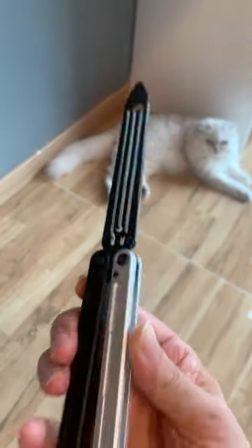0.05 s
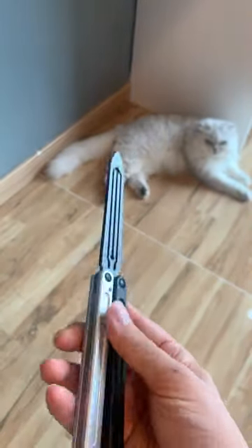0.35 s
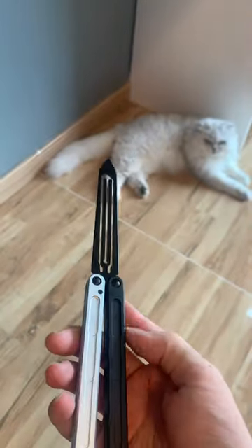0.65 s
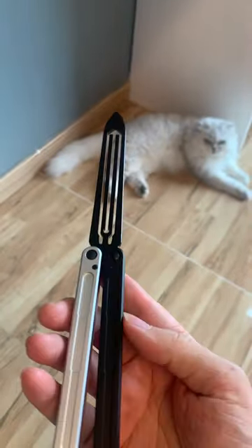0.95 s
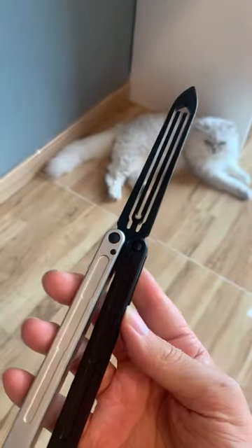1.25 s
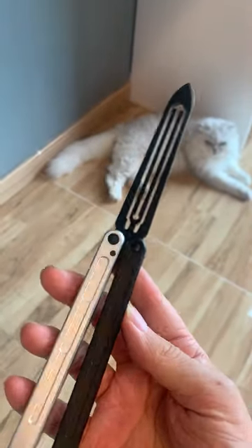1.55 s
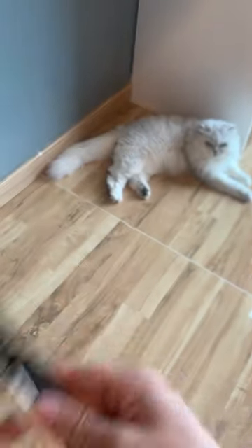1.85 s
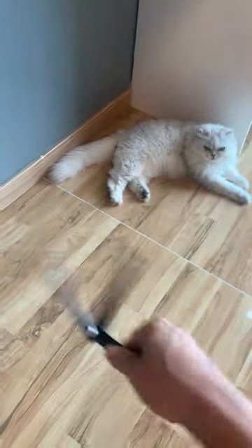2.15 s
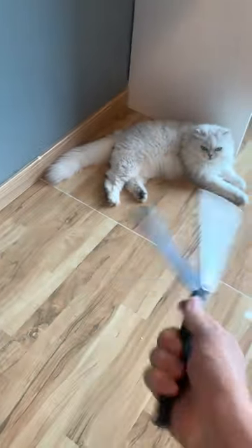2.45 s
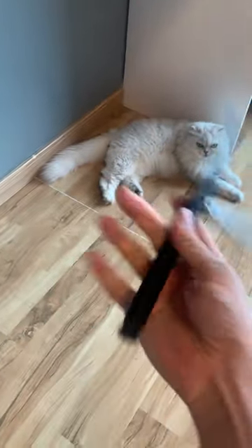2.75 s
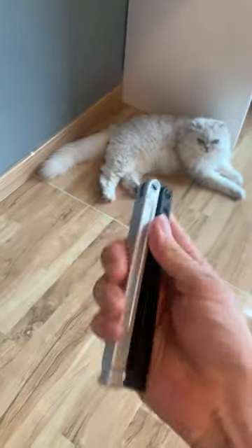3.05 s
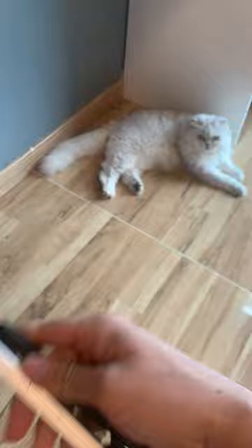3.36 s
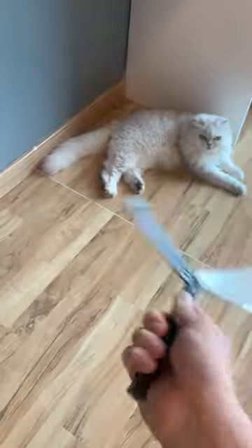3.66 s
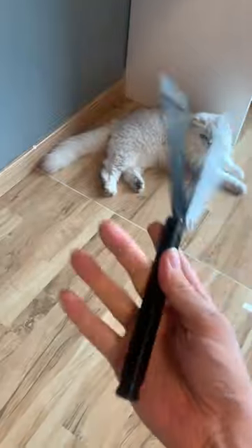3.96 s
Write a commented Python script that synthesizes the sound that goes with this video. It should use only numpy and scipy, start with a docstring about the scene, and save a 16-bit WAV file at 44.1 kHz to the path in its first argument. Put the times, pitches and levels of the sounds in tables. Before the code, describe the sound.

Close by in a quiet room with a low hum, a butterfly knife ticks faintly as it is turned. Dull metal knocks lead to a bright, briefly ringing double clack as the handles shut, then a last knock.

```python
"""Flipping a butterfly knife

A metal butterfly knife is flipped by hand, close by, in a small, quiet room. Its loose pivots tick
faintly and its swinging handles knock dully, damped by the hand. Then the handles slam shut with a
double clack and ring until the fingers close on them. The room echoes briefly over a low hum."""
import sys
import numpy as np
from scipy import signal
from scipy.fft import rfft, irfft
from scipy.io import wavfile
from scipy.ndimage import uniform_filter1d

SR = 44100
rng = np.random.default_rng(int(sys.argv[2]) if len(sys.argv) > 2 else 0)


def generate_wav(signal):
    """Clip the signal to [-1, 1] and save it as 16-bit WAV at the path in sys.argv[1]."""
    frames = np.transpose(np.atleast_2d(signal))
    scaled = np.clip(frames, -1, 1) * 32767
    pcm = np.round(scaled).astype(np.int16)
    wavfile.write(sys.argv[1], SR, pcm)


N = 176400
T = np.arange(SR) / SR  # one second of time, for a single hit or echo


def handle_clacks():
    """A faint tick leads into the sharp clacks of the handles slamming together."""
    # the faint tick, then the clacks: (time [s], level [dB], brightness [dB/octave],
    #  main resonance [Hz], its boost [dB], left over right [dB], left delay [ms])
    hits = [(2.9042, -38.5, -4, 3800, 6, -5, .4), (2.9087, -17.5, -1, 5450, 11.5, -2.5, .45),
            (2.9125, -15.5, 0.5, 5500, 16.5, -2, .45), (2.9208, -20.5, 2, 8200, 9, 5, .4),
            (2.9595, -16, 0, 2850, 6, -2.5, .3), (3.0385, -39.5, -4, 3300, 9, 0, .2),
            (3.0453, -38.5, -7, 2800, 19, -4, .2)]
    # tone of a clack: (frequency [Hz], level [dB])
    colour = [(100, -4), (400, -8.5), (1000, -26), (1600, -7), (2200, -16), (2500, 0), (3800, -0.5),
              (4500, -7.5), (5800, -2.5), (8300, -0.5), (10550, -3), (10850, 5.5), (11100, 0.5), (11400, 0),
              (11800, -3), (12150, 3.5), (12750, -7.5), (13090, -2.5), (13400, -4.5)]
    out = np.zeros((2, N))
    for s, db, *tone in hits:
        add(out, s, contact(db, colour, *tone, crack_s=.03, clatter_s=.05, clatter_db=-5))
    return out


def handle_ring(slam_s=2.909):
    """The handles ring on after the slam, until the fingers grip them."""
    # notes of the loose handles: (frequency [Hz], level [dB], time to fade 60 dB [s])
    notes = [(2379, -43, .65), (2562, -33, .3), (3420, -31, .25), (5391, -27, .28), (5475, -27.5, 1.9),
             (5880, -32, .3), (6306, -24, .38), (8048, -31, .2), (8180, -30, .22), (8748, -39, 1.1),
             (10835, -33, .56), (11390, -34, .28), (12150, -29, .26), (13088, -25, .45)]
    # the ring's loudness as the knife turns and the fingers close: (time [s], level [dB])
    grip = [(2.909, 0), (3.17, 0), (3.23, -11), (3.285, -5), (3.32, -18), (3.46, -18), (3.56, -32),
            (3.9, -70)]
    grip_gain = amp(np.interp(slam_s + T, *np.transpose(grip)))
    out = np.zeros((2, N))
    add(out, slam_s, ring(notes, level_db=-0.5) * grip_gain)
    return out


def handle_knocks():
    """A swinging handle is stopped while the hand damps it: a dull knock and a short ring."""
    # (time [s], level [dB], brightness [dB/octave], main resonance [Hz], its boost [dB],
    #  left over right [dB], left delay [ms])
    knocks = [(2.258, -52, -1, 2600, 16, -2, 0), (2.3036, -40, 0.5, 2400, 13, -1, .15),
              (2.5868, -25.5, -1.5, 3520, 11, -4, .15), (2.6033, -32.5, -0.5, 3560, 1, 0, 0),
              (3.743, -24.5, -0.9, 3640, 4, -1.5, -.1)]
    # tone of a knock: (frequency [Hz], level [dB])
    colour = [(150, -18.5), (900, -16), (1400, -17.5), (1950, 0), (2700, -3.5), (4000, 0), (4800, -6),
              (7300, -3), (8400, -3), (8900, -8.5), (11000, -17.5), (13300, -15.5)]
    # notes of the knife held by one handle: (frequency [Hz], level [dB], time to fade 60 dB [s])
    notes = [(2239, -11, .2), (2379, -13, .2), (3980, -11, .22), (6306, -11, .3), (6890, -14, .24),
             (7477, -18, .28), (10800, -22, .22), (11380, -21, .22), (12150, -25, .2), (13088, -23, .25)]
    out = np.zeros((2, N))
    for s, db, *tone in knocks:
        knock = contact(db, colour, *tone, crack_s=.018, clatter_s=.11, clatter_db=-13)
        add(out, s, knock + ring(notes, db - 13.5))
    return out


def pivot_ticks():
    """The slightly loose pivots tick as the knife is turned over."""
    # (time [s], level [dB], main resonance [Hz])
    ticks = [(0.1436, -54.5, 11000), (.192, -66, 10600), (.2848, -65, 7370), (0.514, -64, 13000),
             (1.666, -65, 11100), (1.8926, -68, 7550), (2.12, -65.5, 6800)]
    # tone of a tick: (frequency [Hz], level [dB])
    colour = [(1000, -27), (5000, -19), (7600, -3.5), (8800, -14), (11000, -3.5), (12200, -17),
              (13200, -2.5)]
    out = np.zeros((2, N))
    for s, db, hz in ticks:
        add(out, s, contact(db, colour, tilt_db=0, peak_hz=hz, boost_db=12, pan_db=0, lag_ms=0,
                            crack_s=.031, clatter_s=.23, clatter_db=0, width=.014))
    return out


def contact(level_db, colour, tilt_db, peak_hz, boost_db, pan_db, lag_ms,
            crack_s, clatter_s, clatter_db, width=.092):
    """One metallic click: a crack and a short, dense clatter, shaped by the knife's resonances."""
    crack, left, other = rng.standard_normal((3, SR))
    likeness = 0.58  # how alike the clatter is on the left and right
    clatter = stereo(left, other, likeness) * amp(clatter_db - 60 * T / clatter_s)
    burst = rfft(crack * amp(-60 * T / crack_s) + clatter)
    burst /= np.sqrt(uniform_filter1d(abs(burst) ** 2, size=1200, axis=1))  # even out the tone
    hz = abs(np.fft.fftfreq(SR, 1 / SR)) + 1
    tone_db = read(colour, hz) + tilt_db * np.log2(np.maximum(hz, 1000) / 4000)
    peak_db = boost_db / (1 + ((hz / peak_hz - 1) / width) ** 2)
    log_gain = np.log(amp(tone_db + peak_db))
    # this filter sounds only after the hit, so the start stays sharp
    body = np.exp(signal.hilbert(log_gain).conj())[:SR // 2 + 1]
    hit = irfft(burst * body, SR) * (T < .5)
    delays = [round(max(ms * SR / 1000, 0)) for ms in (lag_ms, -lag_ms)]
    hit = np.array([np.roll(side, delay) for side, delay in zip(hit, delays)])
    return unit(hit) * amp(level_db - 23 + np.array([[pan_db], [-pan_db]]) / 2)


def ring(notes, level_db, waver_db=3, waver_hz=16, left_lag_ms=.485):
    """The metal's own notes die away, each wavering as the knife turns."""
    out = np.zeros((2, SR))
    arrival = np.array([T - left_lag_ms / 1000, T])
    for hz, db, fade_s in notes:
        waver = waver_db * drift(waver_hz, SR) * np.minimum(T / .1, 1)
        out += amp(db + waver - 60 * T / fade_s) * np.sin(2 * np.pi * (hz * arrival + rng.random()))
    return out * amp(level_db)


def room_echo(sound, gap_s=.0058, early_fade_s=.071, early_db=-2, tail_db=-7.5):
    """Sound bounces off the floor and walls, then blurs into a short tail."""
    # how long the room echoes: (frequency [Hz], time to fade 60 dB [s])
    fades = [(200, 0.23), (2000, 0.29), (4000, 0.4), (8000, 0.36), (13000, 0.26)]
    noise = rng.standard_normal((2, SR)) * (T > gap_s)
    hz, t, spectrum = signal.stft(noise, SR, nperseg=256)
    spectrum *= amp(-60 * t / read(fades, hz)[:, None])
    tail = signal.istft(spectrum, SR, nperseg=256)[1][:, :SR]
    bounces = rng.choice([-1., 1.], (2, SR)) * (rng.random((2, SR)) < .04)
    early = bounces * (T > gap_s) * amp(-60 * T / early_fade_s)
    echo = (amp(tail_db) * unit(tail) + amp(early_db) * unit(early)) / np.sqrt(SR)
    return signal.fftconvolve(sound, echo, axes=1)[:, :N]


def room_air(above_bass_db=-50.5):
    """A soft rush of air whose tone shifts slightly."""
    # tone of the air: (frequency [Hz], level [dB])
    colour = [(15, -50.5), (25, -10.5), (36, -24), (54, -5.5), (107, -9.5), (132, -24.5), (187, -16.5),
              (250, -16.5), (285, -11), (413, -23), (472, -14.5), (583, -22.5), (1320, -22.5),
              (1770, -24.5), (5240, -54.5), (7590, -59), (9630, -66), (10700, -60), (14000, -56.5)]
    # how alike left and right are: (frequency [Hz], likeness [-1 to 1])
    likeness = [(60, 1), (120, 0.81), (200, 0.69), (360, 0.83), (650, -0.53), (1200, -0.1), (2200, -0.5),
                (4000, 0.13), (8000, 0.15)]
    frames, hz = N // 1024 + 5, np.fft.rfftfreq(4096, 1 / SR)
    a, b, c, d, patches = rng.standard_normal((frames, len(hz), 5)).T
    patches = uniform_filter1d(patches, size=20, axis=0)
    flicker_db = unit(uniform_filter1d(patches, size=5, axis=1))
    spectrum = stereo(a + 1j * b, c + 1j * d, read(likeness, hz)[:, None])
    spectrum *= amp(read(colour, hz)[:, None] + flicker_db)
    air = signal.istft(spectrum, nperseg=4096, noverlap=3072)[1][:, :N]
    above_bass = signal.sosfilt(signal.butter(4, 150, "high", fs=SR, output="sos"), air)
    return air * amp(above_bass_db) / above_bass.std()


def room_hum(waver_radians=.97):
    """A low hum of three tones that waver in pitch."""
    # (frequency [Hz], level [dB])
    tones = [(58.5, -50.5), (100.5, -58.5), (285, -62)]
    t = np.arange(N) / SR
    return sum(amp(db) * np.sqrt(2) * np.sin(2 * np.pi * hz * t + waver_radians * drift(15, N))
               for hz, db in tones)


def amp(db):
    """Turns decibels into a gain."""
    return 10 ** (np.asarray(db) / 20)


def unit(x):
    """Scales a signal to an average power of 1."""
    return x / np.sqrt(np.mean(x ** 2) + 1e-20)


def read(points, hz):
    """Reads between a table's rows, with frequency spaced in octaves."""
    row_hz, value = np.transpose(points)
    return np.interp(np.log(hz + 1), np.log(row_hz + 1), value)


def add(mix, s, sound):
    """Adds a stereo sound to the mix at s seconds."""
    part = mix[:, round(s * SR):][:, :sound.shape[1]]
    part += sound[:, :part.shape[1]]


def stereo(left, other, likeness):
    """Blends two noises into a left and a right side that are partly alike."""
    return np.array([left, likeness * left + np.sqrt(1 - likeness ** 2) * other])


def drift(rate_hz, size):
    """A slow random wobble."""
    hz = np.fft.rfftfreq(size, 1 / SR)
    return unit(irfft(rfft(rng.standard_normal(size)) * np.exp(-(hz / rate_hz) ** 2), size))


def scene():
    """The knife's hits and ring, their echo, and the room's air and hum."""
    hits = pivot_ticks() + handle_knocks() + handle_clacks()
    ringing = handle_ring()
    return hits + ringing + room_echo(hits + amp(-11) * ringing) + room_air() + room_hum()


def record(dry):
    """One band of treble is nearly silent, the top is dulled and the highest sounds are cut off."""
    hz = np.fft.rfftfreq(N, 1 / SR)
    above = lambda edge_hz: (1 + np.tanh((hz - edge_hz) / 90)) / 2
    quiet_band_db = -24.5 * (above(8990) - above(10470))
    dull_top_db = -29.5 * above(13300)
    coloured = irfft(rfft(dry) * amp(quiet_band_db + dull_top_db), N)
    low_pass = signal.firwin(255, 14104, window=("kaiser", 7), fs=SR)
    return signal.oaconvolve(coloured, low_pass[None], "same")


dry = scene()
out = record(dry)
generate_wav(out)
```